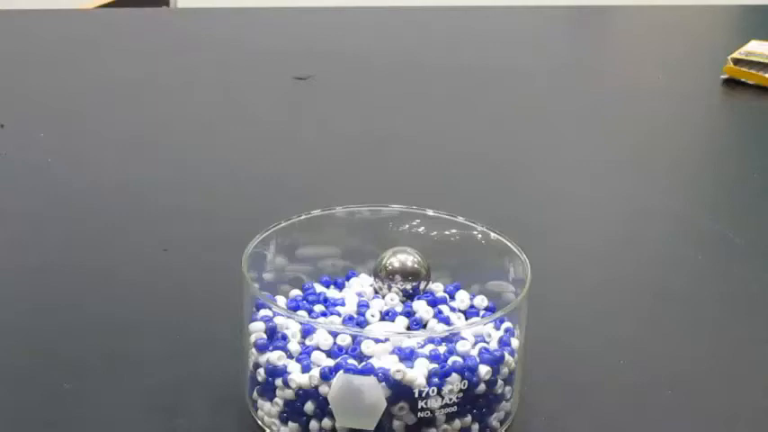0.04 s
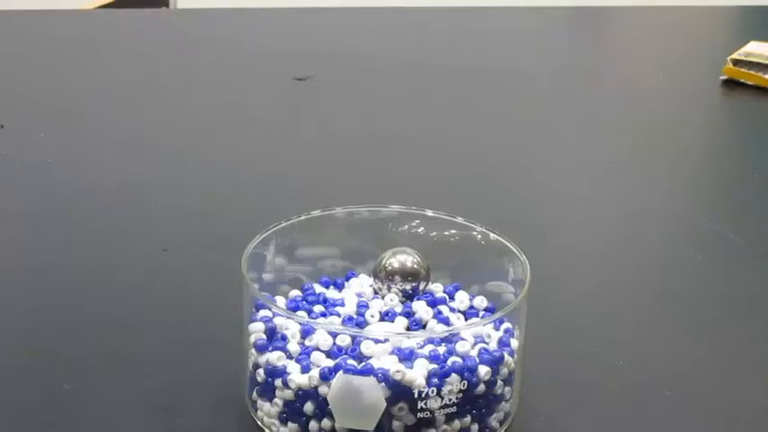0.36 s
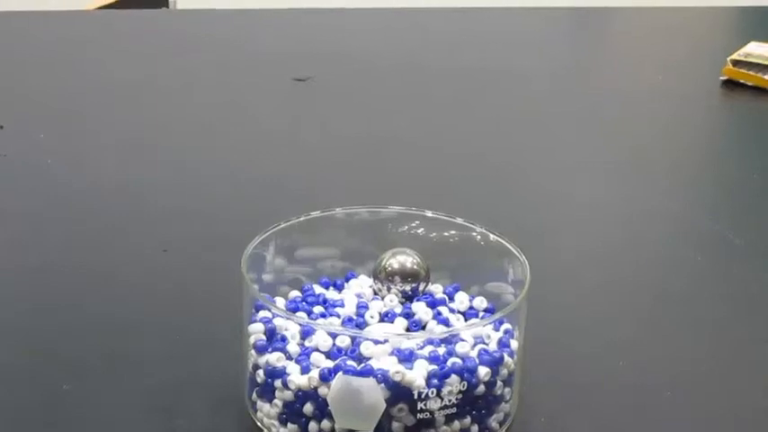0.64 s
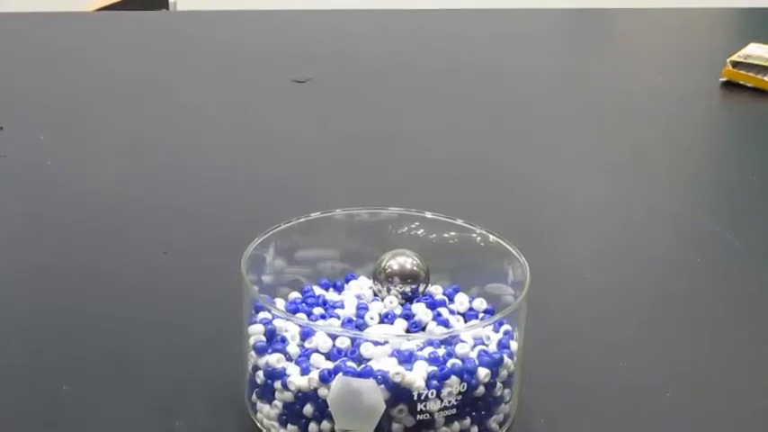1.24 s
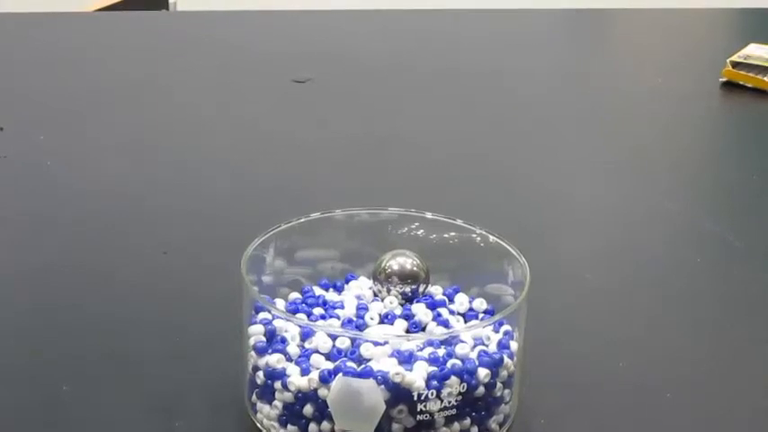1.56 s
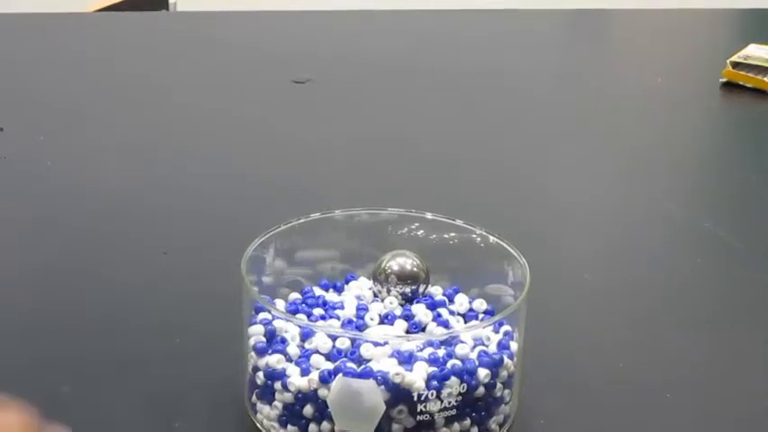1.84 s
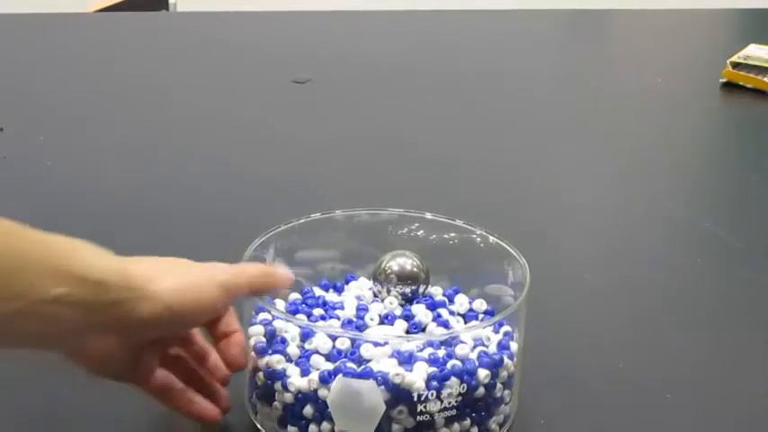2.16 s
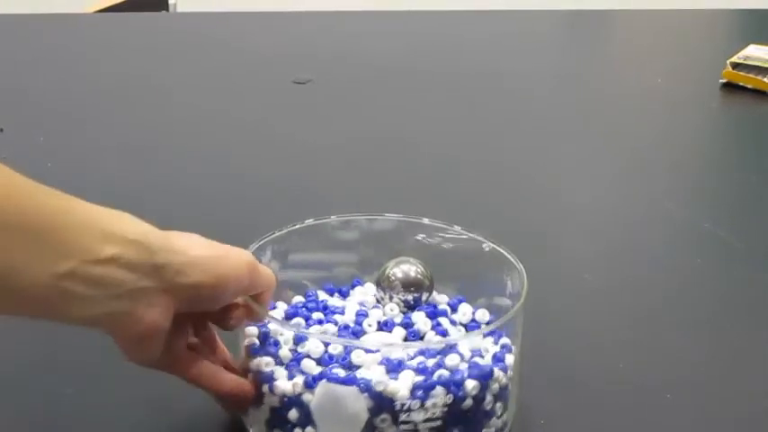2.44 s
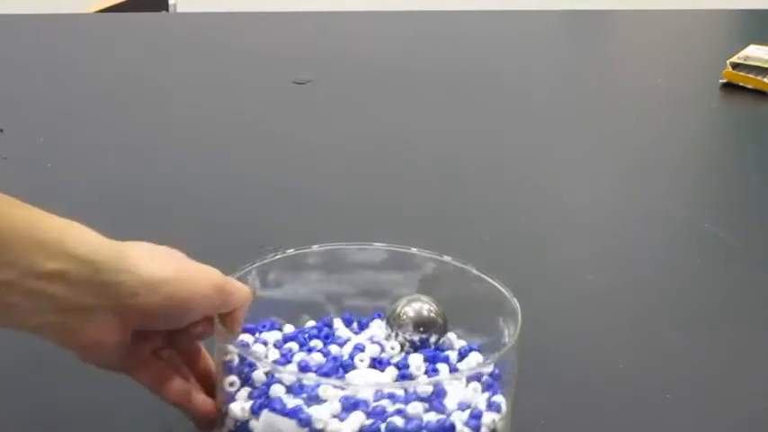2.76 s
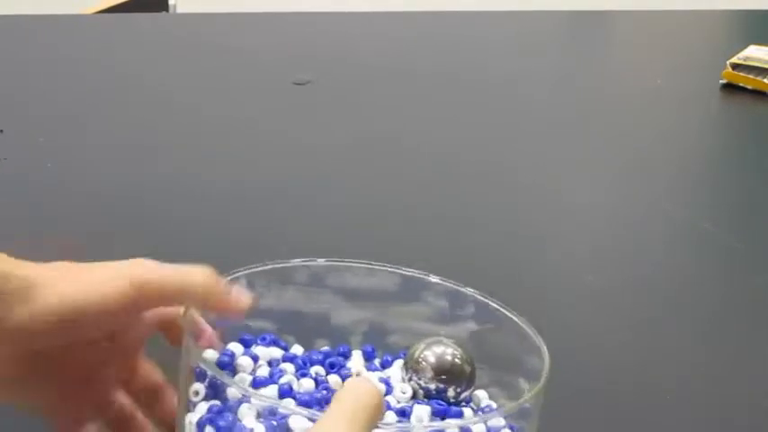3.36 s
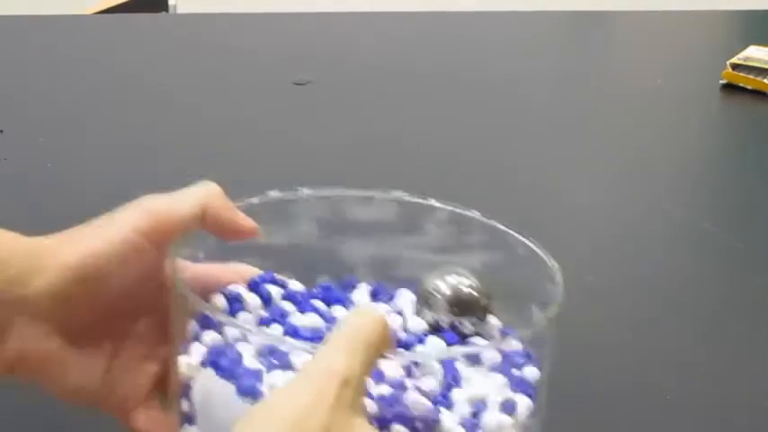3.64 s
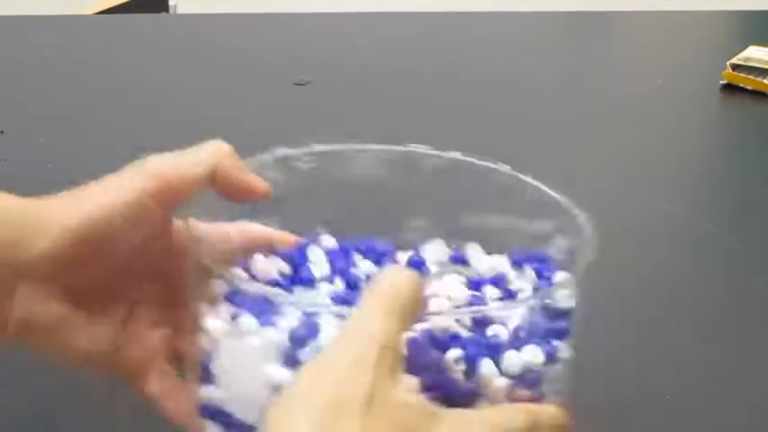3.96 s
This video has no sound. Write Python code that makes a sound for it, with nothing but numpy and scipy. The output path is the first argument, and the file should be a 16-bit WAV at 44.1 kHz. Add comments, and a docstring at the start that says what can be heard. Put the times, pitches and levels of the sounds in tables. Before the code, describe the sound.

Plastic beads rattle in a shaken glass dish. First come a few light, close handling clicks and a soft slide over faint room ventilation, then the loud, dense rattle starts, with a steel ball knocking on the glass.

```python
"""Shaking a glass dish of beads

A glass dish of plastic beads with a steel ball on top stands on a bench in a quiet, ventilated room.
A few handling clicks sound close by; a hand takes the dish, slides it, lifts it and starts to shake it.
The beads pour over each other and against the glass, and the ball knocks on the wall and makes it ring."""
import sys
import numpy as np
from scipy import signal
from scipy.fft import rfft, irfft
from scipy.io import wavfile
from scipy.ndimage import uniform_filter1d

SR = 44100
rng = np.random.default_rng(int(sys.argv[2]) if len(sys.argv) > 2 else 0)


def log_audio(samples):
    """Write samples as a 16-bit WAV file to the path given in sys.argv[1]."""
    # one column per channel
    frames = np.atleast_2d(samples).T
    # limit to full scale, then quantise
    limited = np.clip(frames, -1, 1)
    pcm = np.round(limited * 32767).astype(np.int16)
    wavfile.write(sys.argv[1], SR, pcm)


N = 176400
T = np.arange(N) / SR

# The notes the glass rings at: pitch_hz, fade_s (time to fall by 60 dB), bead_gain_db, ball_gain_db
GLASS_NOTES = [(1111, 0.1, -16, -19.5), (1335, 0.043, -27, -36), (2156, 0.11, -13, -21),
               (2190, 0.099, -25, -21), (2800, 0.037, -12, -39), (3680, .08, -11, -43),
               (5080, 0.099, -15, -44), (5975, 0.03, -3.5, -40), (6590, 0.04, -12.5, -40),
               (7770, .10, -14, -45), (9260, .07, -27, -40), (9500, 0.079, -27, -45)]


def from_db(db):
    """Turn decibels into a number to multiply by."""
    return 10 ** (np.asarray(db) / 20)


def rms_one(x):
    """Scale a signal to an average power of one."""
    return x / np.sqrt(np.mean(x ** 2) + 1e-20)


def colour(x, points):
    """Shape the tone along (pitch_hz, gain_db) points; white noise keeps its power."""
    hz, db = np.transpose(points)
    grid_hz = np.arange(N + 1) * SR / (2 * N)
    gain = from_db(np.interp(np.log(grid_hz + 1), np.log(hz), db))
    cepstrum = irfft(np.log(rms_one(gain)))
    cepstrum[1:N] *= 2  # minimum phase: nothing sounds ahead of a hit
    return irfft(rfft(x, 2 * N) * np.exp(rfft(cepstrum[:N], 2 * N)))[:N]


def noise(points):
    """Noise with the given tone shape."""
    return colour(rng.standard_normal(N), points)


def ring(x, hz, fade_s):
    """Each click in x starts a pure note that fades away."""
    keep = from_db(-60 / (fade_s * SR))
    angle = 2 * np.pi * hz / SR
    return signal.lfilter([0, np.sin(angle)], [1, -2 * keep * np.cos(angle), keep * keep], x + 1e-18)


def resonance(x, hz, width_hz):
    """Bring out a band around one pitch; white noise keeps its power."""
    keep = np.exp(-np.pi * width_hz / SR)
    feedback = [1, -2 * keep * np.cos(2 * np.pi * hz / SR), keep * keep]
    return signal.lfilter(np.sqrt((1 - keep * keep) / 2) * np.array([1, 0, -1]), feedback, x + 1e-18)


def decay(start_s, fade_s):
    """A sudden start, then a fall of 60 dB every fade_s."""
    return (T >= start_s) * np.exp(-np.log(1000) * np.maximum(T - start_s, 0) / fade_s)


def swells(rows):
    """Smooth, bell-shaped rises and falls in level."""
    return sum(from_db(db) * np.exp(-((T - peak_s) / half_s) ** 2 / 2) for peak_s, db, half_s in rows)


def flicker(depth_db, drift_s):
    """A gain that wavers at random."""
    drift = signal.lfilter([1], [1, -np.exp(-1 / (drift_s * SR))], rng.standard_normal(N))
    return from_db(depth_db * rms_one(drift))


def ventilation():
    """Steady rumble and hiss, with narrow fan tones and a low, wavering hum."""
    # Tone of the moving air: pitch_hz, gain_db
    air_tone = [(20, -2.5), (42, -3.5), (85, -1), (150, -9.5), (300, -15.5), (600, -24.5), (790, -30),
                (930, -36), (1120, -27.5), (2000, -26.5), (3500, -31), (4400, -34.5), (6500, -33.5),
                (11000, -39.5)]
    # Fan resonances: pitch_hz, width_hz, level_db
    fan_tones = [(914, 21.7, -62.5), (989, 56, -63.5), (3110, 63, -69.5), (7850, 200, -71)]
    # How the hum rises and falls: time_s, gain_db
    hum_curve = [(0.3, -52.5), (1.26, -43.5), (1.76, -60), (2.03, -52.5), (3.07, -46), (3.15, -58),
                 (3.97, -62), (4.0, -53)]
    fan = np.zeros(N)
    for hz, width_hz, db in fan_tones:
        band = resonance(rng.standard_normal(N), hz, 2 * width_hz)
        fan += from_db(db) * resonance(band, hz, 2 * width_hz) * np.sqrt(4 * np.pi * width_hz / SR)
    hum_hz, start_s, rise_s = 58.5, 0.259, 0.019
    wander = rms_one(ring(rng.standard_normal(N), hz=1.8, fade_s=1.0))
    hum_gain = from_db(np.interp(T, *np.transpose(hum_curve)) - 2)
    hum = hum_gain * np.sqrt(2) * np.sin(2 * np.pi * hum_hz * T + 0.49 * wander)
    air = from_db(-46.5) * noise(air_tone)
    return np.clip((T - start_s) / rise_s, 0, 1) * (air + fan + hum)


def brushes():
    """Light touches of fingers and shifting beads make short, grainy hisses."""
    # Each touch: peak_s, level_db, half_length_s
    touches = [(.39, -47, 0.013), (.435, -61, 0.0077), (2.03, -59.5, 0.086), (2.778, -44.5, .02),
               (3.18, -54.5, 0.033), (3.53, -57.5, 0.051)]
    # Tone of a touch: pitch_hz, gain_db
    touch_tone = [(500, -2.5), (1700, -3.5), (2500, 4.5), (3200, -4.5), (4000, 3), (5400, -8), (6300, 6.5),
                  (7300, -3.5), (11000, -7)]
    return swells(touches) * flicker(depth_db=1, drift_s=0.008) * noise(touch_tone)


def handling_clicks():
    """Each dry click is a burst of chatter with a bright crack and a small thud."""
    # Each click: start_s, level_db, low_hz, high_hz, fade_s, crack_gain_db, thud_gain_db
    clicks = [(0.4099, -25.5, 1990, 6600, 0.0064, -14, -7), (0.4444, -32, 1400, 3900, .016, -29, -9),
              (.622, -23.5, 2130, 4020, 0.026, -15.5, -15), (.6255, -24.5, 2170, 3380, 0.014, -10.5, -9),
              (2.3581, -30.5, 1240, 2180, 0.0087, -26, -15), (2.769, -41, 2600, 7000, 0.04, -24, -21),
              (2.7975, -31, 2850, 7100, 0.0052, -16, -8), (3.176, -46.5, 2500, 7650, 0.032, -18, -15),
              (3.289, -42.5, 2800, 7050, 0.01, -18, -8)]
    # Tone of the crack: pitch_hz, gain_db
    crack_tone = [(200, 10), (700, -10), (1100, -1), (2000, 4), (7000, 12.5), (11000, -5.5)]
    thud_hz, thud_fade_s = 448, 0.033
    chatter, thuds, cracks = np.zeros((3, N))
    for start_s, db, low_hz, high_hz, fade_s, crack_db, thud_db in clicks:
        burst = from_db(db) * decay(start_s, fade_s) * rng.choice([-1, 1], N)
        band = signal.butter(2, [low_hz, high_hz], "band", fs=SR, output="sos")
        chatter += signal.sosfilt(band, burst + 1e-18) * np.sqrt(SR / 2 / (high_hz - low_hz))
        thud_note = np.sin(2 * np.pi * thud_hz * (T - start_s))
        thuds += from_db(db + thud_db) * decay(start_s, thud_fade_s) * thud_note
        cracks += from_db(crack_db) * burst
    return chatter + thuds + 2 * colour(cracks, crack_tone)


def sliding():
    """The hand and the dish rub over the bench, which hisses and rumbles."""
    # Swells of hiss and of rumble: peak_s, level_db, half_length_s
    hisses = [(2.4, -64.5, 0.074), (2.6, -48.5, 0.14)]
    rumbles = [(1.48, -57, 0.056), (1.76, -56, .08), (2.0, -54.5, 0.067), (2.46, -50, 0.27)]
    # Tones of the sliding dish and of the bench top: pitch_hz, gain_db
    slide_tone = [(500, -7), (800, -3), (1150, -10), (1450, 2.5), (1800, 3.5), (2600, 0), (4300, -0.5),
                  (5400, -3.5), (6600, 3), (8000, 0.5), (11000, -5)]
    bench_tone = [(80, -11), (130, 0.5), (230, -1.5), (400, -4), (620, -8.5), (800, -23), (1500, -8.5),
                  (2200, -19), (4000, -24.5)]
    return swells(hisses) * noise(slide_tone) + swells(rumbles) * noise(bench_tone)


def contacts(level_db):
    """Beads bump at random, more often and harder as the level rises."""
    peak_hits_per_s, size_spread_db = 4500, 2
    chance = peak_hits_per_s * from_db(0.7 * (level_db - level_db.max())) / SR
    sizes = from_db(size_spread_db * np.minimum(rng.exponential(1, N), 3.5)) * rng.choice([-1, 1], N)
    hits = sizes * (rng.random(N) < chance) + from_db(-21.5) * rng.standard_normal(N)
    clumps = flicker(depth_db=1.74, drift_s=0.012)
    local_level = np.sqrt(uniform_filter1d(hits ** 2, size=500) + 1e-9)
    return from_db(level_db) * clumps * hits / local_level


def shaken_beads():
    """Loose beads tick and clack, the pile crunches, both ring the glass, and the ball rolls on top."""
    # Strength of the shake: time_s, loose_beads_db, pile_db, rolling_db
    shake = [(3.61, -42, -48.5, -51.5), (3.634, -36, -49.5, -58.5), (3.66, -42.5, -49, -52),
             (3.67, -34, -39, -35), (3.706, -26, -35.5, -38.5), (3.718, -18.5, -34, -31.5),
             (3.74, -29.5, -36.5, -47.5), (3.774, -25, -38, -53), (3.834, -18, -21, -38),
             (3.842, -16, -20.5, -45), (3.878, -16.5, -23.5, -33.5), (3.896, -16.5, -18, -26),
             (3.91, -22.5, -26, -35.5), (3.948, -16, -30, -36), (3.976, -19, -29, -35),
             (4.0, -16, -25, -42)]
    # Beads thrown at the glass: start_s, level_db
    throws = [(3.5989, -17.5), (3.617, -25), (3.678, -22), (3.711, -21), (3.7192, -11.5), (3.7337, -17.5),
              (3.7965, -9), (3.8265, -14), (3.8482, -18), (3.858, -17), (3.874, -7), (3.924, -11),
              (3.964, -9), (3.990, -22)]
    # Tones of the loose beads, the churning pile and the rolling ball: pitch_hz, gain_db
    loose_tone = [(1500, -17.5), (4300, -12.5), (5300, 3), (6000, 0), (6800, 4), (7700, -3), (9300, 2.5),
                  (11000, -2.5)]
    pile_tone = [(400, -17.5), (850, -19), (1250, 4), (1600, -3), (2200, 0), (3000, -2.5), (4200, -6),
                 (6000, -9)]
    roll_tone = [(60, -21), (180, -7.5), (300, 0.5), (480, 2.5), (650, -1.5), (850, -20.5), (2000, -22)]
    start_s, rise_s, damping_hz = 3.565, 0.013, 22
    times, *levels = np.transpose(shake)
    loose_db, pile_db, roll_db = [np.interp(T, times, db) for db in levels]
    moving = np.clip((T - start_s) / rise_s, 0, 1)
    hits = moving * contacts(loose_db - 4.5)
    clacks = sum(from_db(db) * decay(at_s, fade_s=0.013) for at_s, db in throws) * rng.choice([-1, 1], N)
    pitches_hz = np.linspace(4500, 11500, 12)
    picked = rng.integers(0, len(pitches_hz), N)  # each hit gets one of the pitches
    ticks = sum(resonance(hits * (picked == k), hz, hz / 5.15) for k, hz in enumerate(pitches_hz))
    pile = moving * contacts(pile_db - 1)
    glass = np.zeros(N)
    for hz, fade_s, db, _ in GLASS_NOTES:
        drive = pile if hz < pitches_hz[0] else hits + clacks
        width_hz = np.log(1000) / np.pi / fade_s + damping_hz  # moving beads shorten the ring
        glass += from_db(db - 4.5) * resonance(drive, hz, width_hz)
    roll = moving * colour(contacts(np.minimum(roll_db, -33) + 1.5), roll_tone)
    return colour(ticks + clacks, loose_tone) + colour(pile, pile_tone) + glass + roll


def ball_knocks():
    """Each knock of the steel ball is a short push that thumps the dish and rings its wall."""
    # Each knock: start_s, level_db, contact_s
    knocks = [(3.8925, 2.5, 0.00031), (3.8951, -2.5, .0007)]
    # Low notes of the full dish in the hand: pitch_hz, fade_s, gain_db
    body_notes = [(135, 0.11, -31), (235, .07, -34.5), (330, 0.021, -16.5), (446, 0.016, -17),
                  (483, 0.11, -26)]
    pushes = [(from_db(db), np.sin(np.pi * np.clip((T - start_s) / contact_s, 0, 1)))
              for start_s, db, contact_s in knocks]
    force = sum(gain * push / push.sum() for gain, push in pushes)
    wall = sum(from_db(db) * ring(force, hz, fade_s) for hz, fade_s, _, db in GLASS_NOTES)
    thump = sum(from_db(db) * ring(force, hz, fade_s) for hz, fade_s, db in body_notes)
    pulse = from_db(-10.5) * sum(gain * push for gain, push in pushes)
    bass_cut = signal.butter(2, 158, "high", fs=SR, output="sos")
    return signal.sosfilt(bass_cut, wall + thump + pulse)


def with_close_echoes(x):
    """Sound bounces off the dish wall and the bench a moment later."""
    # Each bounce: delay_s, gain_db
    echoes = [(.00115, -16.5), (.0024, -15.5), (.0047, -18)]
    return x + sum(from_db(db) * np.pad(x, (int(delay_s * SR), 0))[:N] for delay_s, db in echoes)


def room_echo(x):
    """The room's many echoes blur into a short tail."""
    tail = (decay(start_s=0.0088, fade_s=0.52) * rng.standard_normal(N))[:SR // 2]
    return signal.fftconvolve(x, tail / np.sqrt(np.sum(tail ** 2)))[:N]


def scene():
    """The dish in its room, with handling and ventilation, in one channel."""
    dish = with_close_echoes(shaken_beads()) + ball_knocks()
    echo = from_db(-10.5) * room_echo(dish)
    handling = handling_clicks() + brushes() + sliding()
    return (dish + echo + handling + ventilation())[None]


def record(dry):
    """The microphone has a narrow dip in the treble, and the highest treble is cut steeply."""
    dip_hz, top_hz = 4797, 10950
    dipped = signal.lfilter(*signal.iirnotch(dip_hz, Q=5.94, fs=SR), dry)
    return signal.sosfilt(signal.ellip(16, .2, 90, top_hz, fs=SR, output="sos"), dipped)


dry = scene()
out = record(dry)
log_audio(out)
```